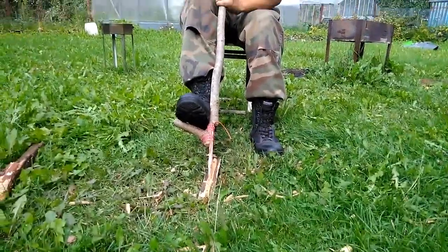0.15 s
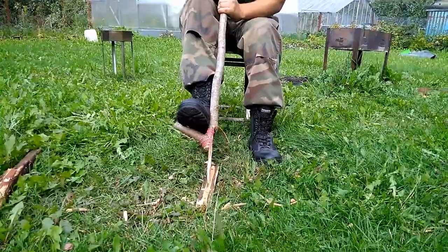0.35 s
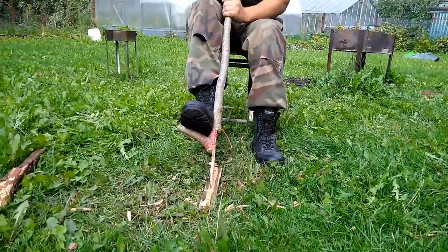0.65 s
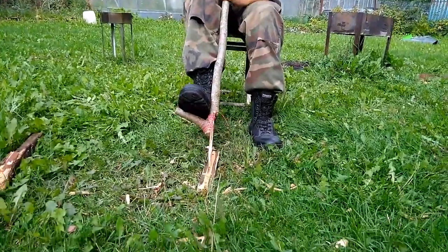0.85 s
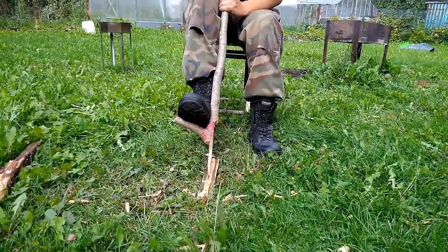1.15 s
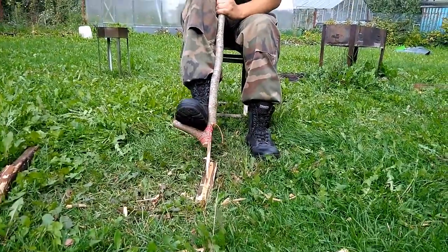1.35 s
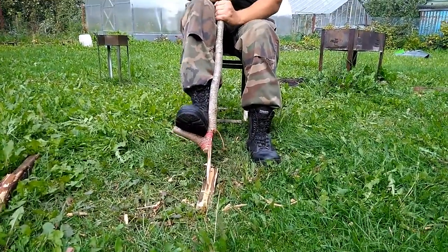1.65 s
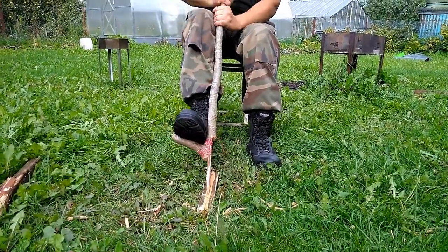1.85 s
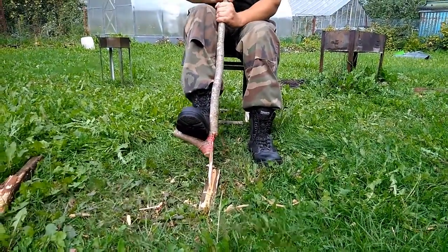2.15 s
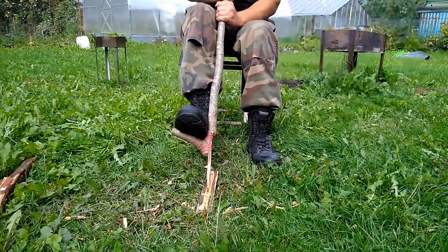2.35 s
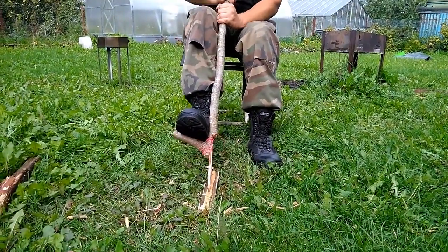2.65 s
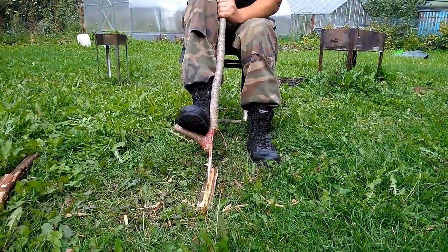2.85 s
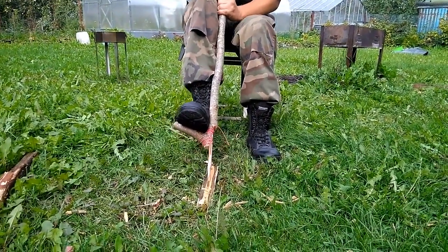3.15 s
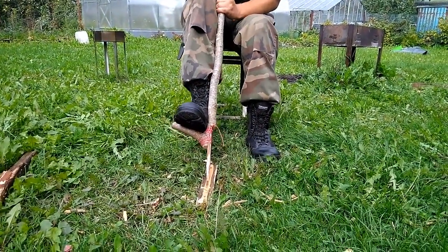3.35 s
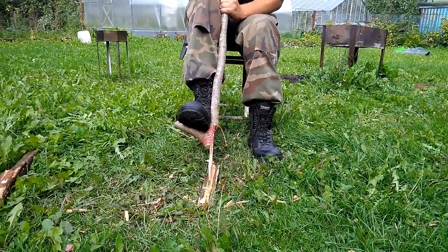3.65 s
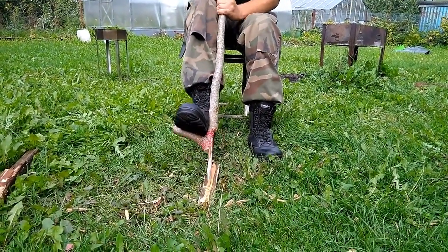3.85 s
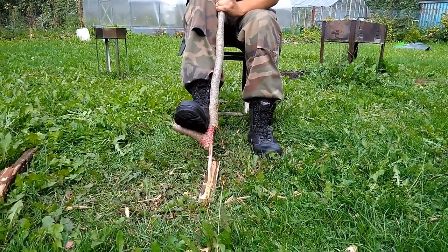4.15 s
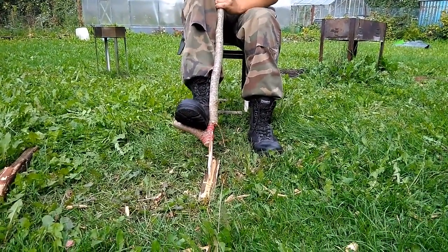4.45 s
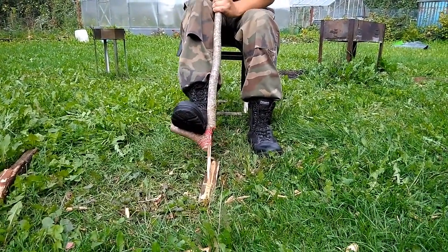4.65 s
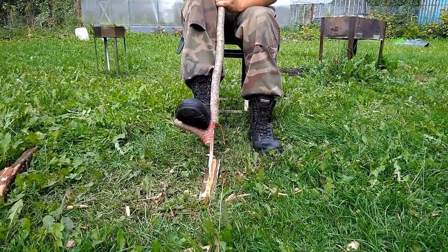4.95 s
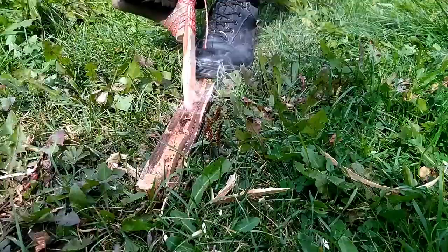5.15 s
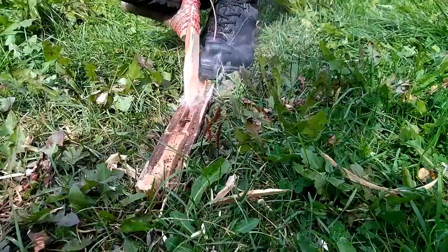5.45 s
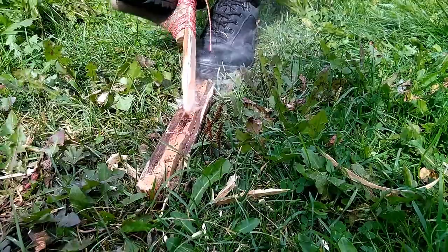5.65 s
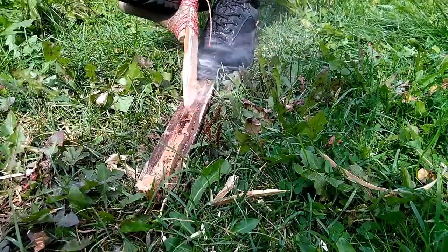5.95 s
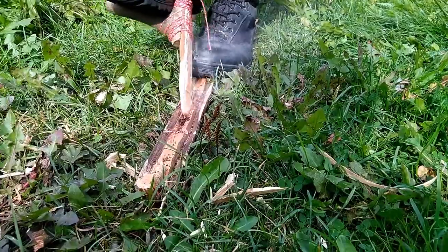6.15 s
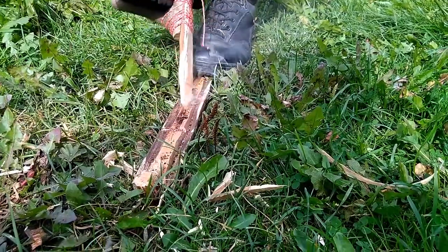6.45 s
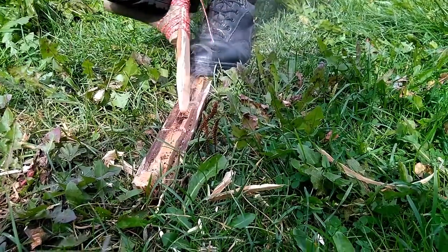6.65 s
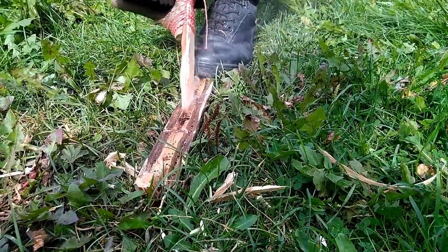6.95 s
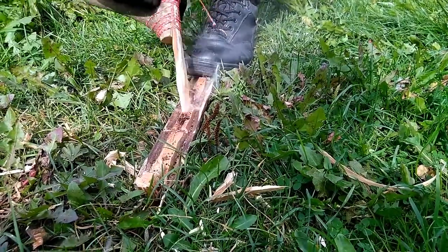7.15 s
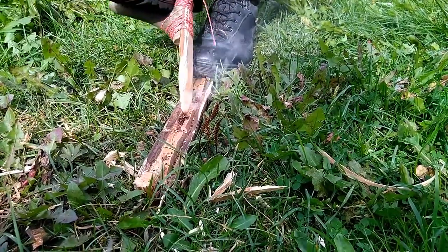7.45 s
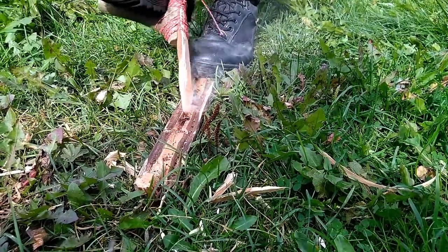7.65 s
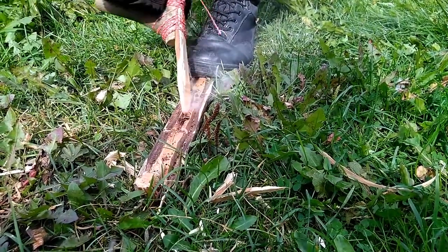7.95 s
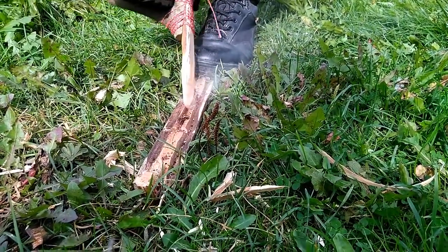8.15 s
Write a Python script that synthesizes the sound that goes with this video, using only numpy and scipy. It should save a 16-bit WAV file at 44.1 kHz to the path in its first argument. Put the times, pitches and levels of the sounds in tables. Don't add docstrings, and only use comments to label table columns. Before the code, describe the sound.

Outdoors on a lawn, a dry stick starts with a brief uneven scratch, then saws rapidly along a groove in a wooden board, about seven even rasping strokes a second. A few light taps sound close to the microphone on the left. Just after five seconds the microphone is suddenly much closer: the rubbing becomes loud and woody, with snapping fibres, low knocks and one very sharp crack.

```python
import sys
import numpy as np
from scipy import signal
from scipy.fft import rfft, irfft, next_fast_len
from scipy.io import wavfile
from scipy.ndimage import map_coordinates

SR = 44100
rng = np.random.default_rng(int(sys.argv[2]) if len(sys.argv) > 2 else 0)


def transcribe(u):
    v = np.clip(np.atleast_2d(u).T, -1, 1)
    q = np.round(v * 32767).astype(np.int16)
    wavfile.write(sys.argv[1], SR, q)


def convert_level_to_amplitude(level_db):
    exponent = np.asarray(level_db, float) / 20
    return 10 ** exponent


N = 366471
CLOSE_S = 5.1915
SPLIT_HZ, TREBLE_LAG_S = 3100, .0062
RUMBLE_FAR_DB, RUMBLE_NEAR_DB = -55, -42.5

# (frequency [Hz], left density [dB per Hz], right density [dB per Hz])
RUB_SPECTRUM_FAR = [(250, -75, -76.5), (470, -82, -82.5), (930, -84, -91), (970, -79, -72),
                    (1960, -81.5, -82), (2467, -73, -67.5), (2790, -83.5, -92), (4000, -90.5, -86),
                    (4970, -99, -84.5), (7000, -94, -83.5), (7200, -88, -82.5), (9400, -102.5, -102.2),
                    (9500, -102.2, -99.3), (14800, -104.1, -102.5)]
RUB_SPECTRUM_NEAR = [(250, -68.5, -68), (410, -83.5, -87), (794, -75.5, -76.5), (970, -69, -70),
                     (1570, -68, -66), (2690, -70.5, -76), (2900, -85.5, -75.5), (3880, -80.5, -82.5),
                     (5100, -97, -78), (7050, -93, -73.5), (7780, -89, -79.5), (9300, -83, -94),
                     (9800, -94, -85.5), (16100, -99, -96.5)]
AIR_SPECTRUM_FAR = [(200, -84, -83), (376, -92.5, -97.5), (516, -96, -92.5), (900, -94, -98.5),
                    (1730, -99.4, -100.0), (2460, -100.4, -101.2), (2880, -103.5, -104.5),
                    (3750, -100.7, -101.5), (5200, -101.7, -100.4), (7500, -101.3, -99.0),
                    (7950, -101.0, -103.2), (10100, -104.9, -105.2), (15700, -106.1, -107.4)]
AIR_SPECTRUM_NEAR = [(200, -77.5, -75), (337, -79.5, -81), (493, -83.5, -82), (905, -86, -86.5),
                     (1760, -87.5, -89), (2510, -86, -87.5), (2870, -88.5, -93), (3930, -91, -91),
                     (5140, -95.5, -90.5), (6900, -91.5, -90), (8550, -94.5, -92.5), (10100, -94, -95),
                     (15500, -96.5, -94)]
# (frequency [Hz], level [dB])
RUMBLE_SPECTRUM_FAR = [(15, -43), (25, -18), (38, -7), (65, 0), (91, -2.5), (145, -7.5), (188, -22),
                       (200, -63), (260, -40), (440, -120)]
RUMBLE_SPECTRUM_NEAR = [(15, -46), (25, -13), (43, -20), (59, 9), (70, -1), (102, -6.5), (200, -8.5),
                        (260, -39), (440, -120)]
# (frequency [Hz], likeness [0-1])
PORT_LIKENESS = [(60, 0.82), (250, 0.49), (900, 0.78), (2200, 0.09), (5000, 0.05), (6500, 0), (10000, 0),
                 (15000, 0)]
# (centre [Hz], width [Hz], likeness [0-1])
SHARED_WAVE_BAND = [(3050, 260, .92), (3230, 600, .98)]
# (far [s], near [s])
LEFT_PORT_LAG = (.000164, .00015)
# (time [s], extra level [dB], half length [s])
RUMBLE_SWELLS = [(0.3, -3, 0.13), (2.13, 2.5, .07), (3.3, 3, 0.37), (3.61, 4.5, .06), (3.905, 4.5, 0.045),
                 (4.05, 3, .04), (4.65, 2.5, .08), (5.767, 4.5, .08), (7.1, 3, 0.091), (7.312, 1.5, .05),
                 (7.89, 11, 0.032), (8.065, 6.5, 0.037)]
# (time [s], level [dB])
FIRST_DRAG = [
    (0.02, -80),
    (0.138, -48),
    (0.16, -66),
    (0.194, -43),
    (0.211, -72),
    (0.218, -41),
    (0.444, -48),
    (0.542, -51),
    (0.604, -71),
]
# (pull start [s], push start [s], pull level [dB], push level [dB])
FAR_CYCLES = [(0.09, 0.205, -62, -57), (0.329, 0.439, -56, -53.5), (0.608, 0.763, -47, -48),
              (0.928, 1.071, -48.5, -44.5), (1.241, 1.382, -50.5, -48), (1.531, 1.681, -49, -47),
              (1.831, 1.989, -48, -48.5), (2.125, 2.27, -49, -47), (2.414, 2.554, -49.5, -47),
              (2.699, 2.838, -48.5, -48.5), (2.978, 3.113, -50, -48.5), (3.252, 3.392, -50.5, -48.5),
              (3.542, 3.676, -49, -49), (3.821, 3.961, -51.5, -47.5), (4.105, 4.245, -51, -48.5),
              (4.38, 4.515, -50, -49.5), (4.649, 4.779, -51, -52), (4.899, 5.023, -51.5, -50)]
# (push start [s], pull start [s], push level [dB], pull level [dB])
NEAR_CYCLES = [(5.143, 5.29, -37, -37), (5.393, 5.533, -37.5, -40.5), (5.651, 5.798, -41.5, -38),
               (5.909, 6.052, -40.5, -39), (6.176, 6.31, -38.5, -37), (6.435, 6.572, -40.5, -39.5),
               (6.696, 6.831, -41, -39.5), (6.972, 7.096, -39.5, -37.5), (7.238, 7.368, -40.5, -39.5),
               (7.493, 7.623, -40, -39), (7.753, 7.894, -37.5, -35.5), (8.022, 8.156, -38, -40),
               (8.29, 8.42, -35.5, -45)]
# (place of top speed [0-1], board over hiss [dB], board hum [Hz], thump over hiss [dB])
PULL_HABIT_FAR = (0.49, -10, 980, -10)
PUSH_HABIT_FAR = (0.65, -8.5, 1118, -1)
PULL_HABIT_NEAR = (0.34, -11, 1552, -9.5)
PUSH_HABIT_NEAR = (0.53, -6.5, 1138, -6.5)
# (stroke start [s], extra board level [dB], board hum [Hz], extra thump level [dB])
DIGGING_STROKES = [(0.205, -19, 1030, 4.5), (0.329, 3.5, 1020, 11.5), (0.439, 2.5, 1030, 5),
                   (0.608, 2.5, 750, 5.5), (0.928, 0.5, 695, 6), (1.241, 0.5, 600, 5), (1.531, -1, 1020, 4),
                   (1.831, -0.5, 1050, 1), (2.699, -0.5, 1010, -9), (4.649, 1.5, 970, -8),
                   (5.023, -2, 1460, -6), (5.143, 5.5, 716, -1), (5.29, 5, 600, -13), (5.393, 4, 750, 1.5),
                   (5.533, 3, 600, -7), (6.31, 3.5, 604, -2), (6.435, -0.5, 1490, -4), (6.696, 1, 1210, 4),
                   (7.096, 2.5, 590, 3.5), (7.238, 1.5, 1250, -7), (7.623, 0.5, 1570, 4.5),
                   (7.753, 5, 763, 11), (7.894, 3.5, 590, -1), (8.022, 3, 580, -2), (8.156, -1, 1570, -7.5)]
# (time [s], peak level [dB], left over right [dB])
FIBRE_SNAPS = [(0.1889, -40, -5.5), (0.2203, -25, -9.0), (0.2344, -35, -4.5), (0.2617, -32, -7.5),
               (0.2764, -36, -6.5), (0.3141, -35, -6.5), (0.5246, -39, -5.0), (0.6588, -39, -5.5),
               (0.6733, -35, -6.5), (0.7835, -38, -4.0), (1.007, -34, -6.5), (1.0174, -34, -4.5),
               (1.0988, -39, -4.5), (2.7098, -42, -5.5), (5.3138, -32, -8.0), (5.4829, -23, -9.0),
               (5.8302, -30, -9.0), (6.0064, -29, -5.5), (6.0452, -27, -7.0), (6.3126, -27, -6.0),
               (6.6019, -33, -8.0), (7.0, -34, -7.0), (7.0973, -31, -4.5), (7.1512, -30, -8.5),
               (7.2829, -8, -5.0), (7.3637, -23, -8.0), (7.5333, -31, -8.0), (7.7907, -33, -7.5),
               (7.9139, -26, -7.5), (8.0551, -31, -7.5)]
# (frequency [Hz], decay time t60 [s], left level [dB], right level [dB])
PORT_CAVITIES = [(4600, .003, -22, -20), (6100, .003, -11, -9), (7250, .0055, -8, 0), (8700, .005, 0, -8),
                 (10800, .003, -10, -5), (13500, .002, -16, -13)]
# (time [s], peak level [dB], frequency [Hz], decay time t60 [s])
BOARD_KNOCKS = [
    (0.216, -37.5, 2100, .01),
    (1.789, -35, 200, 0.023),
    (4.57, -42, 120, 0.065),
    (6.02, -29, 1690, .01),
    (6.521, -26, 250, 0.01),
    (6.563, -21.5, 337, 0.0044),
    (7.164, -20, 736, 0.0053),
    (7.359, -40, 704, .01),
    (7.861, -15, 125, 0.024),
    (8.146, -38, 547, 0.014),
]
# (time [s], knock peak level [dB], crack level [dB])
PORT_TAPS = [
    (1.323, -40.5, -20),
    (2.337, -16, -6),
    (2.834, -26.5, -26),
    (3.141, -26, -20.5),
    (4.046, -20, -11),
]
# (time [s], extra lag of the left port [samples], wobble of that lag [samples])
LEFT_LAG_WANDER = [
    (0, -5, 0.68),
    (0.55, -2.0, .6),
    (0.68, 0, .4),
    (1.2, 0.7, 0.34),
    (2.0, -0.2, .3),
    (5.18, -0.3, .3),
    (5.2, 1.4, 0.77),
    (6.4, 1.5, .7),
    (6.5, 0, 0.48),
    (8.31, 0, .5),
]


def rms_one(x):
    return x / np.sqrt(np.mean(x ** 2) + 1e-20)


def level_by_shot(x):
    cut = round(CLOSE_S * SR)
    return np.hstack([rms_one(x[:, :cut]), rms_one(x[:, cut:])])


def at_hz(rows, hz, axis=1):
    rows = np.array(rows)
    return np.interp(np.log(hz + 1), np.log(rows[:, 0]), rows[:, axis])


def drift(rate):
    r = np.exp(-2 * np.pi * rate / SR)
    settle = 9000
    noise = rng.standard_normal(N + settle)
    return rms_one(signal.lfilter([1], [1, -2 * r, r * r], noise)[settle:])


def band(x, low_hz, high_hz, order=2):
    return signal.sosfilt(signal.butter(order, [low_hz, high_hz], "band", fs=SR, output="sos"), x)


def ring(x, hz, t60):
    r, w = convert_level_to_amplitude(-60 / (t60 * SR)), 2 * np.pi * hz / SR
    return signal.lfilter([0, np.sin(w)], [1, -2 * r * np.cos(w), r * r], x + 1e-18)


def blow(hz, t60, soft_s):
    push = np.zeros(3000)
    contact = np.hanning(max(round(soft_s * SR), 3))
    push[:len(contact)] = contact
    sound = ring(push, hz, t60)
    return sound / np.abs(sound).max()


def add(out, sound, s):
    at = max(round(s * SR), 0)
    piece = sound[..., :N - at]
    out[..., at:at + piece.shape[-1]] += piece


def at_ports(shared, own, far, near):
    size = next_fast_len(N)
    hz = np.arange(size // 2 + 1) * SR / size
    usual = np.clip(at_hz(PORT_LIKENESS, hz), 0, 1)
    right, other = rfft(shared, size), rfft(own, size)
    shots = []
    for colour, lag_s, (same_hz, width_hz, most) in zip((far, near), LEFT_PORT_LAG, SHARED_WAVE_BAND):
        alike = usual + (most - usual) * np.exp(-((hz - same_hz) / width_hz) ** 2)
        delayed = right * np.exp(-2j * np.pi * hz * lag_s)
        left = np.sqrt(alike) * delayed + np.sqrt(1 - alike) * other
        pair = [left * convert_level_to_amplitude(at_hz(colour, hz)), right * convert_level_to_amplitude(at_hz(colour, hz, axis=-1))]
        shots.append(irfft(pair, size)[:, :N])
    return np.sqrt(SR / 2) * np.where(np.arange(N) < CLOSE_S * SR, *shots)


def background():
    white = rng.standard_normal((4, N))
    air = at_ports(white[0], white[1], AIR_SPECTRUM_FAR, AIR_SPECTRUM_NEAR)
    air = band(air, 172, 21000) * convert_level_to_amplitude(2.0 + 0.34 * drift(1.7))
    rumble = at_ports(white[2], white[3], RUMBLE_SPECTRUM_FAR, RUMBLE_SPECTRUM_NEAR)
    rumble = band(rumble, 35, 171, order=3)
    t = np.arange(N) / SR
    swell_db = sum(db * np.exp(-((t - s) / half_s) ** 2) for s, db, half_s in RUMBLE_SWELLS)
    return air + level_by_shot(rumble) * convert_level_to_amplitude(np.where(t < CLOSE_S, RUMBLE_FAR_DB, RUMBLE_NEAR_DB) + swell_db)


def strokes():
    rows = []
    for cycles, habits in ((FAR_CYCLES, (PULL_HABIT_FAR, PUSH_HABIT_FAR)),
                           (NEAR_CYCLES, (PUSH_HABIT_NEAR, PULL_HABIT_NEAR))):
        for cycle in cycles:
            for s, db, (top, board_db, hz, thump_db) in zip(cycle[:2], cycle[2:], habits):
                rows.append((s, top, db, db + board_db, hz, db + thump_db))
    rows = np.array(rows)
    for s, board_db, hz, thump_db in DIGGING_STROKES:
        k = np.argmin(np.abs(rows[:, 0] - s))
        rows[k, 3:] = rows[k, 3] + board_db, hz, rows[k, 5] + thump_db
    return rows


def speed(power, late_s, column):
    rows = strokes()
    turn, top = rows[:, :2].T
    fastest = turn[:-1] + np.clip(top[:-1], .25, .75) * np.diff(turn)
    knots = np.ravel([turn[:-1], fastest], "F")
    t = np.arange(N) / SR + TREBLE_LAG_S - late_s
    angle = np.interp(t, np.append(knots, turn[-1]), np.arange(len(knots) + 1)) * np.pi / 2
    stroke = np.clip(np.searchsorted(turn, t) - 1, 0, None)
    cut = round(CLOSE_S * SR)
    still_far = (np.arange(N) < cut) & (stroke == stroke[cut])
    return np.abs(np.sin(angle)) ** power * convert_level_to_amplitude(rows[stroke, column] - 21 * still_far)


def grit(per_s, spread_db):
    sizes = convert_level_to_amplitude(spread_db * np.minimum(rng.exponential(1, N), 4)) * rng.choice([-1, 1], N)
    slipping = rng.random(N) < per_s / SR
    return rms_one(sizes * slipping * convert_level_to_amplitude(0.96 * drift(220) + 1.2 * drift(28)))


def patchy(x, edges_hz, patch_db, rate):
    bands = zip(edges_hz, edges_hz[1:])
    return level_by_shot(sum(band(x, low, high, order=3) * convert_level_to_amplitude(patch_db * drift(rate)) for low, high in bands))


def hum(x):
    out, rows = np.zeros_like(x), strokes()
    for (s, _, hiss_db, board_db, hz, _), after in zip(rows, rows[1:]):
        part = slice(round(s * SR), min(round(after[0] * SR), N))
        travel = np.linspace(0, 1, part.stop - part.start)
        start_tone = ring(x[:, part], 1.18 * hz, .014)
        end_tone = ring(x[:, part], .93 * hz, .014)
        tone = (1 - travel) * start_tone + travel * end_tone
        out[:, part] = rms_one(tone) * convert_level_to_amplitude(-3.5 + 1.55 * (board_db - hiss_db + 3.5))
    return out


def rubbing():
    slips = at_ports(grit(14000, 2.9), grit(14000, 2.4), RUB_SPECTRUM_FAR, RUB_SPECTRUM_NEAR)
    hiss = patchy(slips, [SPLIT_HZ, 4700, 6200, 8300, 11000, 17500], patch_db=1.15, rate=18)
    board = patchy(slips, [430, 800, 1250, 1900, SPLIT_HZ], patch_db=2.2, rate=20)
    board = board + hum(board)
    thump = level_by_shot(band(slips, 125, 403)) * convert_level_to_amplitude(2.5 * drift(21))
    clumps = convert_level_to_amplitude(np.where(np.arange(N) < CLOSE_S * SR, .8, 1.6) * drift(70))
    s, db = np.transpose(FIRST_DRAG)
    drag = np.interp(np.arange(N) / SR, s, convert_level_to_amplitude(db - 8.0), right=0)
    hiss_level = speed(1.7, 0.0021, column=2) * convert_level_to_amplitude(-0.04) + drag
    board_level = speed(1.71, 0.0005, column=3) * convert_level_to_amplitude(4.5) + drag * convert_level_to_amplitude(-5.5)
    thump_level = speed(1.08, 0.0075, column=5) * convert_level_to_amplitude(-5.0)
    return clumps * hiss * hiss_level + clumps * board * board_level + thump * thump_level


def cracks():
    out, t = np.zeros((2, N)), np.arange(500) / SR
    for (s, db, pan_db), noise in zip(FIBRE_SNAPS, rng.standard_normal((len(FIBRE_SNAPS), 506))):
        ticks = .04 * noise[:500] * np.exp(-t / .003)
        ticks[0] = 1
        snap = np.zeros((2, 500))
        for k, (hz, t60, left_db, right_db) in enumerate(PORT_CAVITIES):
            level_db = np.array([[left_db], [right_db]]) + 1.5 * noise[500 + k]
            snap += convert_level_to_amplitude(level_db) * ring(ticks, hz, t60)
        if db < -15:
            snap += ring(ticks, 4600, .0025) + 1.5 * ring(ticks, 6000, .002)
        snap = band(snap, 4200, 17000, order=4)
        snap *= convert_level_to_amplitude(3.1 * (s < CLOSE_S)) / np.abs(snap).max(1, keepdims=True)
        add(out[0], snap[0] * convert_level_to_amplitude(db + 5.8 + pan_db), s - TREBLE_LAG_S + .0015)
        add(out[1], snap[1] * convert_level_to_amplitude(db + 5.8), s - TREBLE_LAG_S + .0013)
    return out


def knocks():
    out = np.zeros((2, N))
    for s, db, hz, t60 in BOARD_KNOCKS:
        add(out, -convert_level_to_amplitude(db) * blow(hz, t60, 0.32 / hz) * [[.8], [1]], s)
    return out


def taps():
    out, t = np.zeros((2, N)), np.arange(400) / SR
    knock = -blow(1075, .013, .0006) - .12 * blow(500, .025, .0008)
    knock += .55 * blow(1700, .005, .0004) - .12 * blow(2600, .003, .0002)
    casing = blow(496, 0.039, 0.00099)
    for (s, db, crack_db), noise in zip(PORT_TAPS, rng.standard_normal((len(PORT_TAPS), 2, 400))):
        add(out[0], convert_level_to_amplitude(db + 7.0) * knock, s + 0.00119)
        add(out[1], convert_level_to_amplitude(db - 13.5) * casing, s + 0.0014)
        burst = noise * (.35 * np.exp(-t / .0004) + .03 * np.exp(-t / .0015))
        burst[:, 0] = 2.0
        crack = band(burst, 3500, 10000, order=4) + .4 * band(burst, 10000, 16500)
        port_db = np.array([[17.5], [-4]])
        add(out, crack / np.abs(crack).max() * convert_level_to_amplitude(db + crack_db + port_db), s + .0021)
    return out


def swaying(x):
    s, lag, wobble = np.transpose(LEFT_LAG_WANDER)
    t = np.arange(N) / SR
    where = np.arange(N) - np.interp(t, s, lag) + np.interp(t, s, wobble) * drift(4.9)
    return np.array([map_coordinates(x[0], [where], order=3, mode="nearest"), x[1]])


def scene():
    return swaying(background() + rubbing()) + cracks() + knocks() + taps()


def band_limit(x):
    return signal.sosfilt(signal.butter(12, 16980, fs=SR, output="sos"), x)


def record(dry):
    low = band(dry, 35.4, SPLIT_HZ, order=6)
    high = signal.sosfilt(signal.butter(6, SPLIT_HZ, "high", fs=SR, output="sos"), dry)
    late = np.roll(high, round(TREBLE_LAG_S * SR), axis=1)
    top_cut = signal.ellip(10, .5, 42, 15830, fs=SR, output="sos")
    mix = signal.sosfilt(top_cut, low + late)
    return band_limit(mix)


dry = scene()
out = record(dry)
transcribe(out)
```